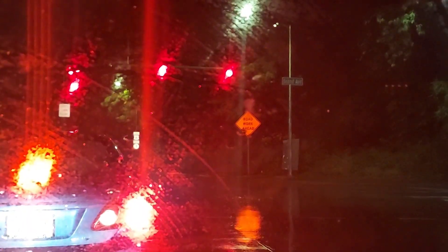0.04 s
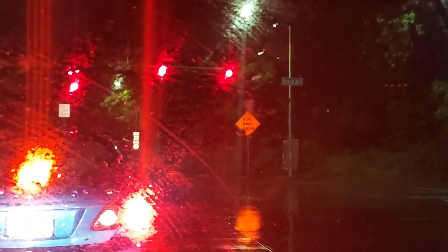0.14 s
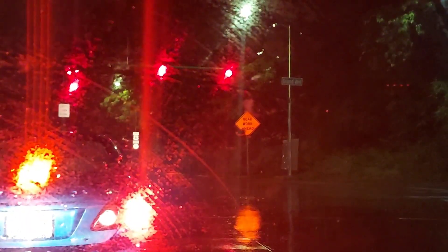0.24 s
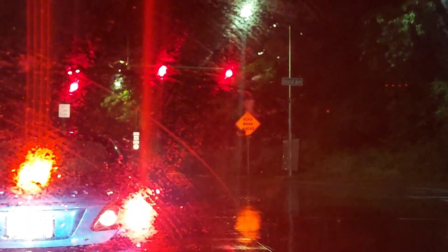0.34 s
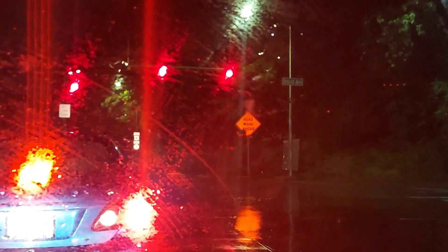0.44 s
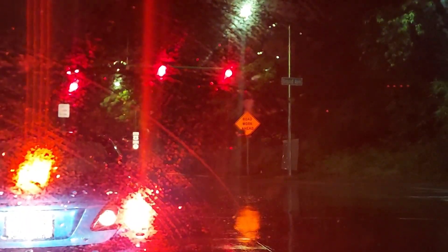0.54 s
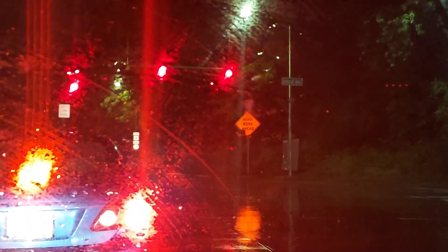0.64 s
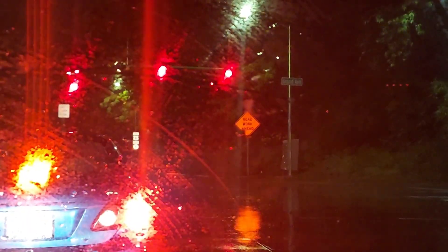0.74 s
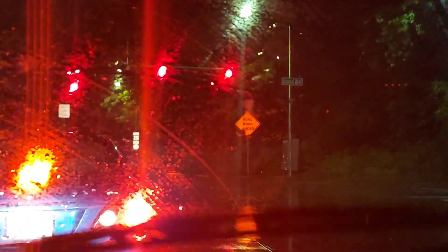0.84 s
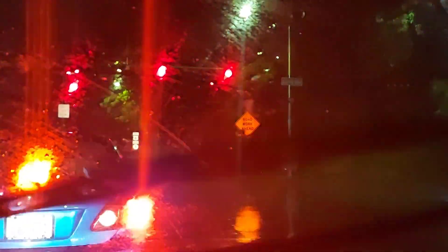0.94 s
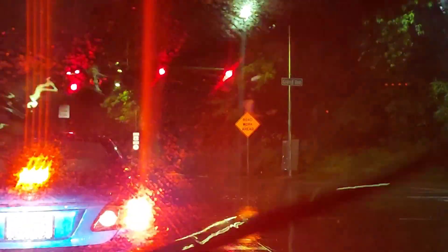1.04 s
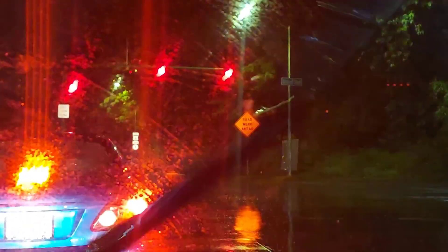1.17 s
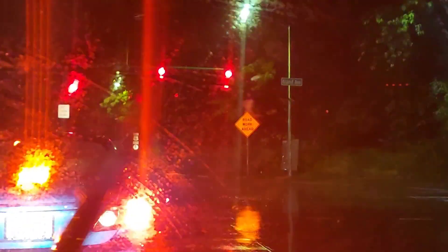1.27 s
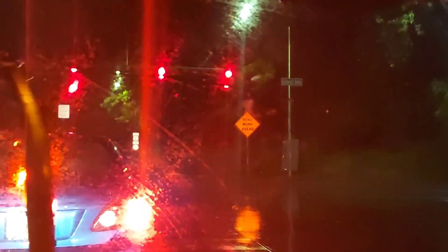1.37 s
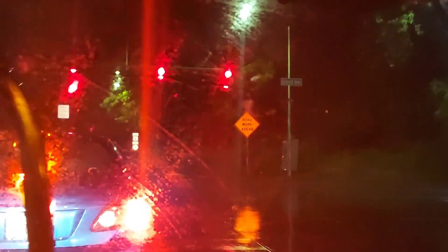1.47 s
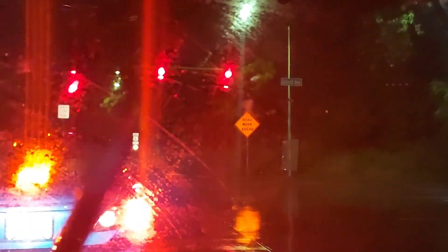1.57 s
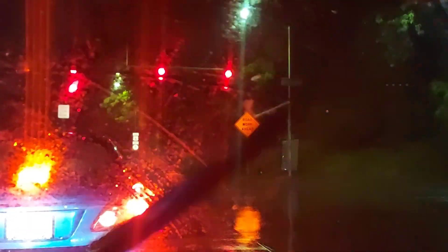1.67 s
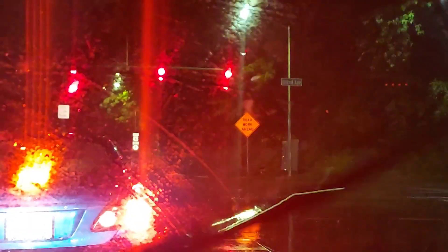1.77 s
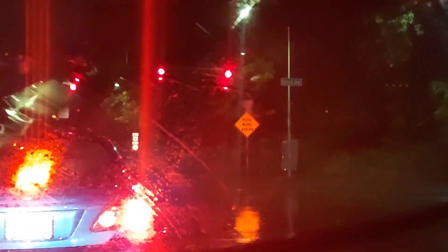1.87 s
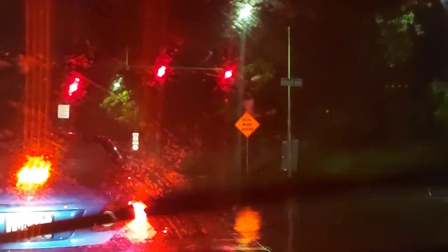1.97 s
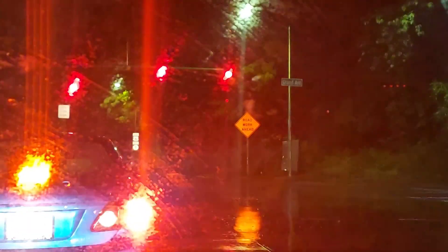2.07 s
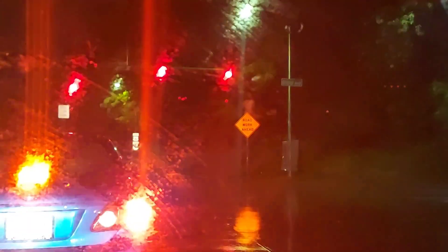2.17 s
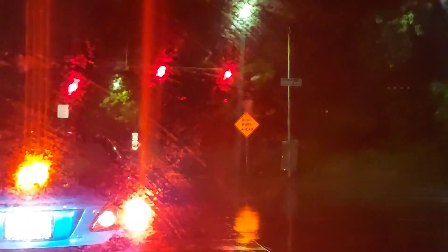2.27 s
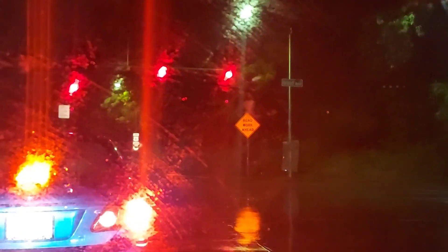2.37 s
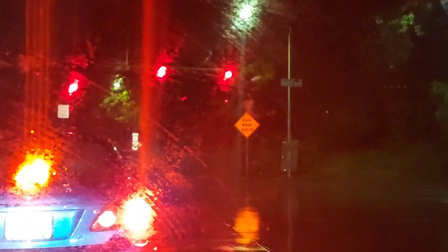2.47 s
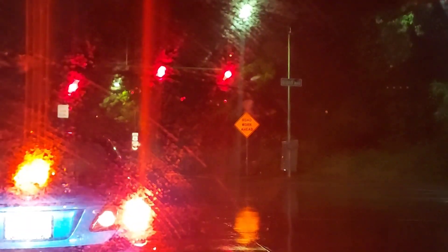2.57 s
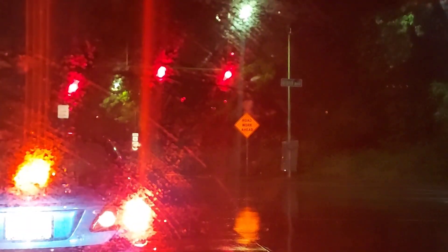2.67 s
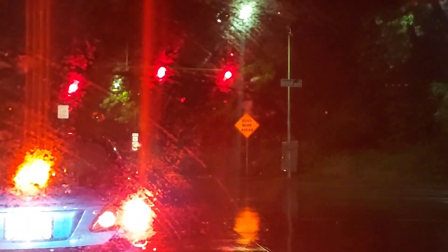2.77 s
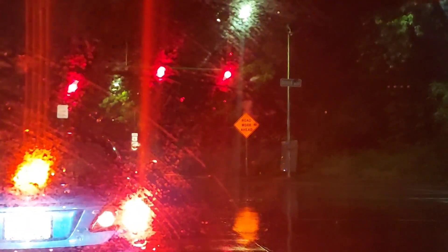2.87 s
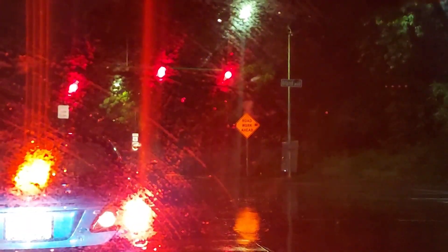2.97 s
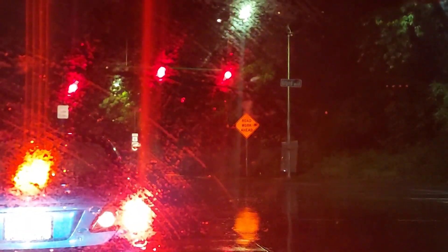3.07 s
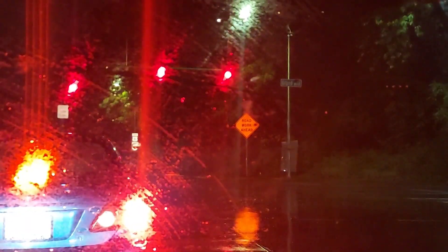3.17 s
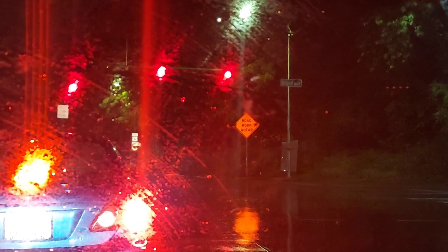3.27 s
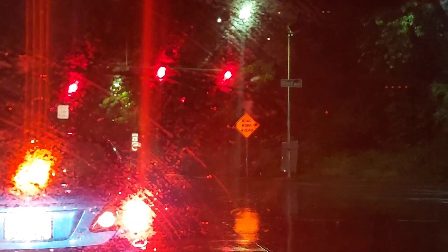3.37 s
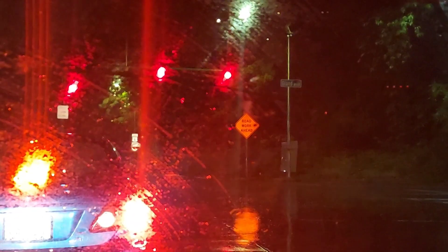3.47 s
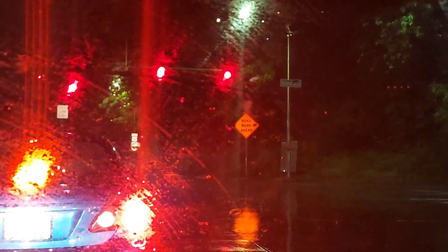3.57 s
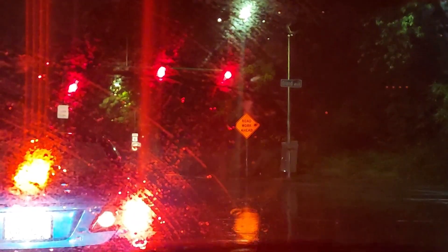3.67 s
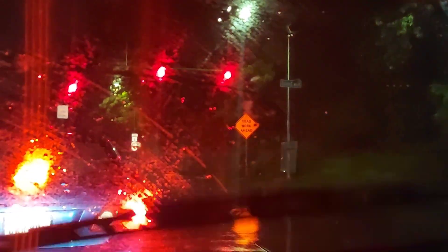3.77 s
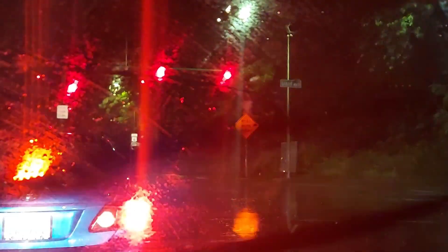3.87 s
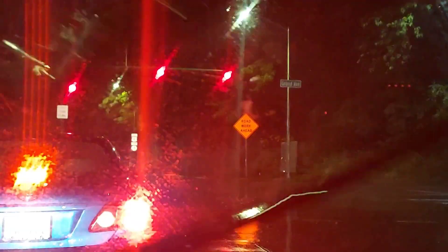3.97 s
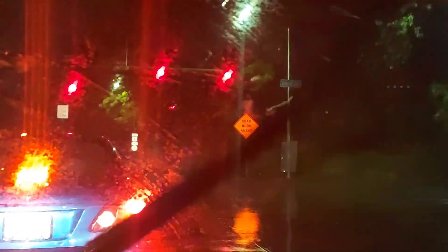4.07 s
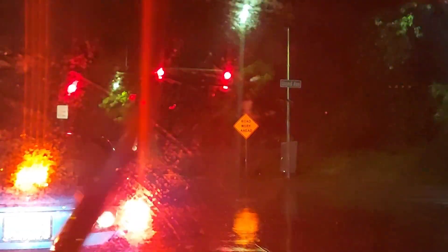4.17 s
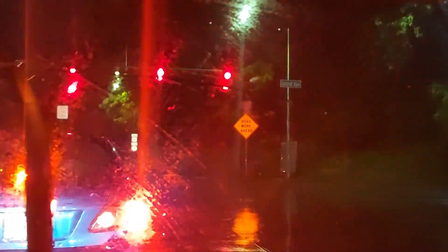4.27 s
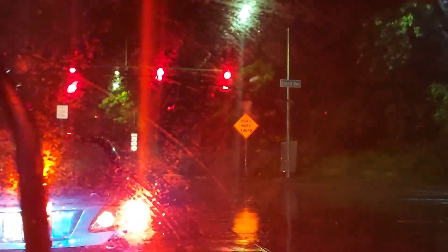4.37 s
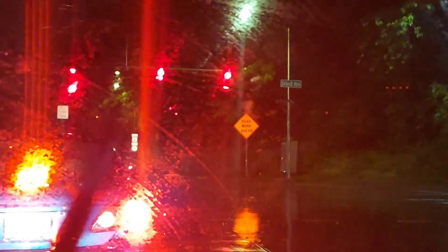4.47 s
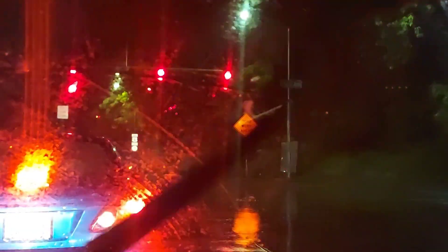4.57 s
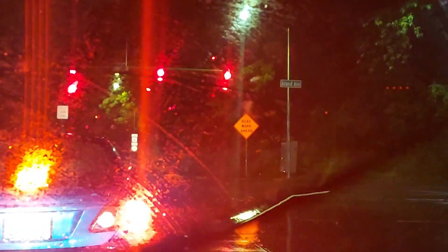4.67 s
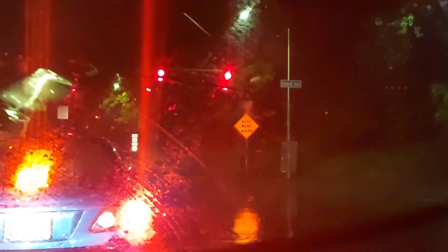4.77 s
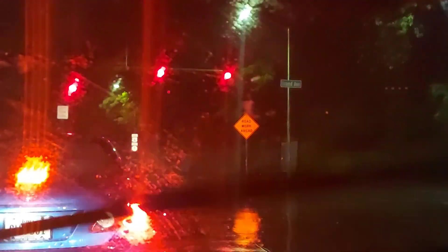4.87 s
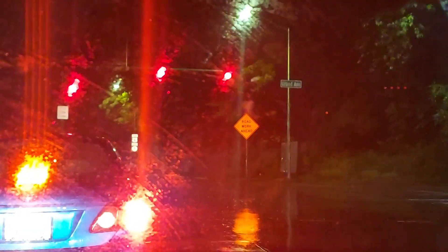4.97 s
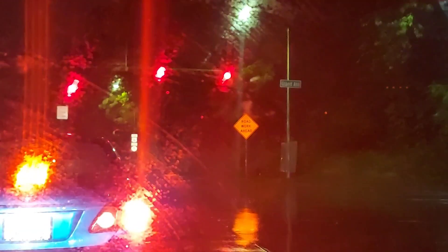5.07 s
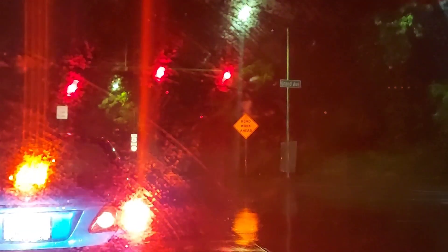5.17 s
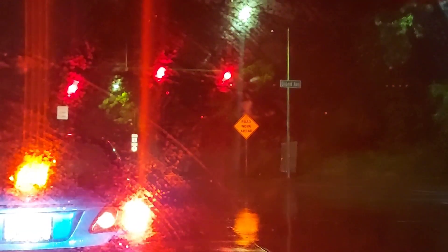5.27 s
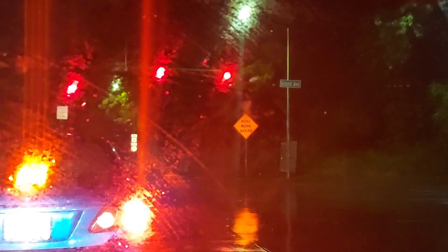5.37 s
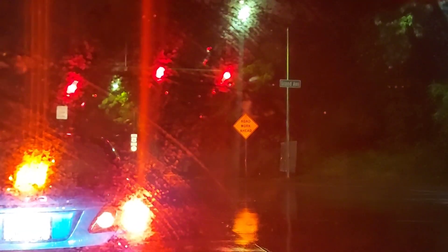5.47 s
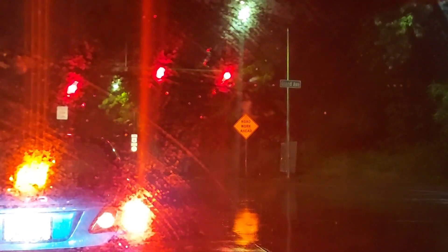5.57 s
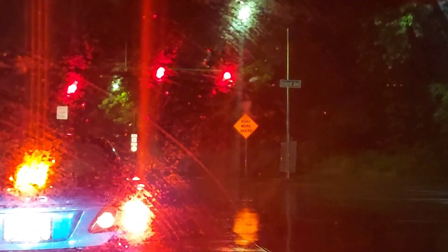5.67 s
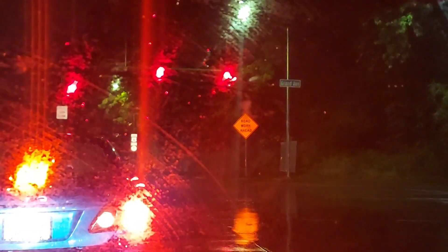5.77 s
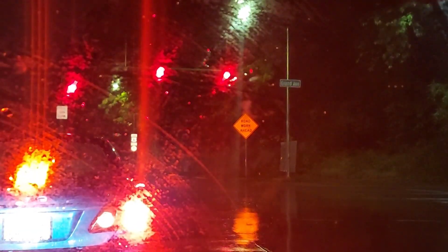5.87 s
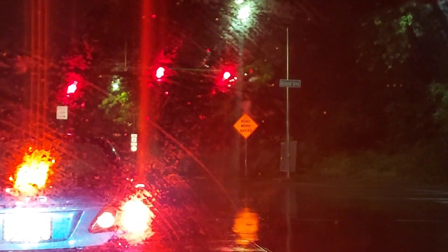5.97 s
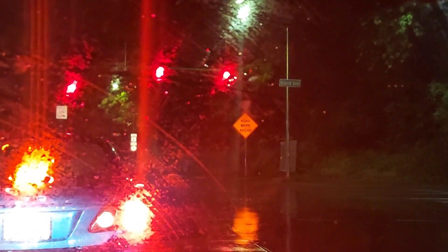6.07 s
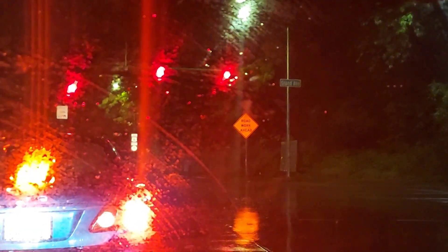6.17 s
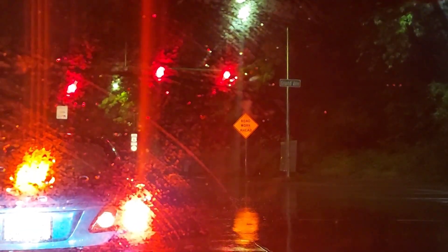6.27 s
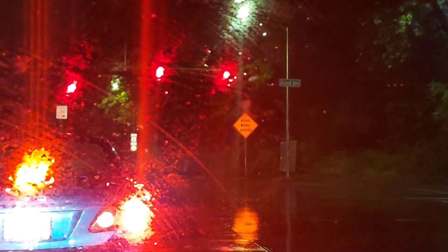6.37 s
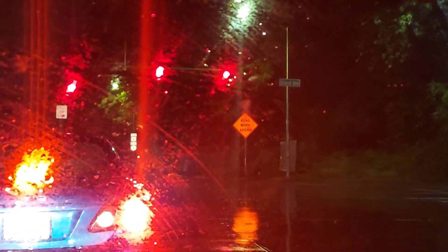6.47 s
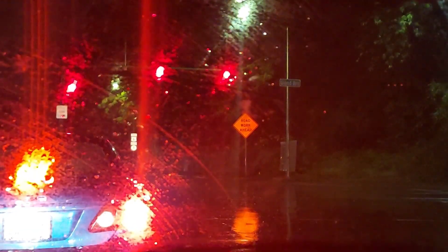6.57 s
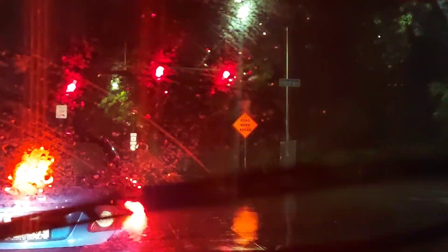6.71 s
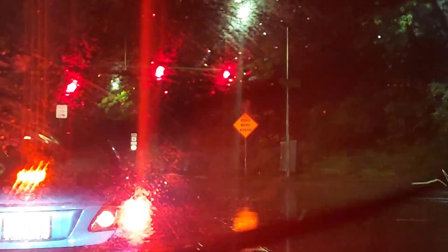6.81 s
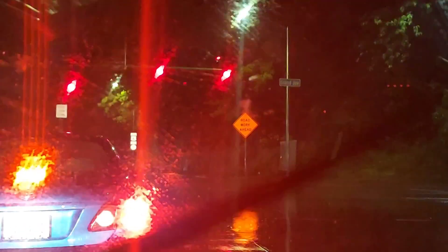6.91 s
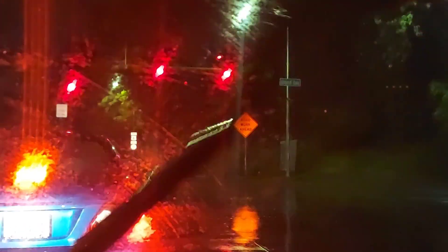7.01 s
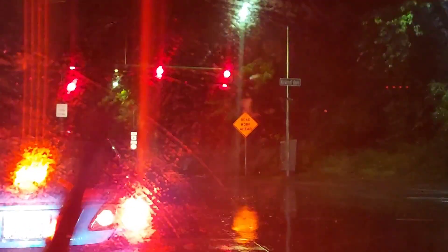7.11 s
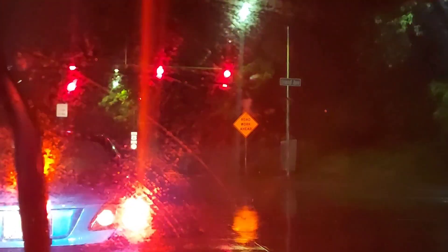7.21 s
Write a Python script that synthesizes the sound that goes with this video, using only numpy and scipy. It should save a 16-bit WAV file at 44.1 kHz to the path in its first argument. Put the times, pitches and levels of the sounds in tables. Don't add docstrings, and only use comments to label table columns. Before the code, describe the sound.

Inside a car idling in light rain at night, wipers sweep every three seconds with paired low thuds over rumble and soft air hiss.

```python
import sys
import numpy as np
from scipy import signal
from scipy.fft import rfft, irfft, next_fast_len
from scipy.io import wavfile
from scipy.ndimage import uniform_filter1d

SR = 44100
rng = np.random.default_rng(int(sys.argv[2]) if len(sys.argv) > 2 else 0)


def nominal_scale(level):
    x = np.asarray(level, float) / 20
    return 10 ** x


def wrap_up_sound(samples):
    columns = np.atleast_2d(samples).T
    tamed = np.clip(columns, -1, 1)
    steps = np.round(tamed * 32767).astype(np.int16)
    wavfile.write(sys.argv[1], SR, steps)


N = 319408

# [t/s of the crest, level/dB]
SET_OFF = [
    (0.8037, 0),
    (3.704, -0.5),
    (6.6025, -1.1),
]
# [t/s of the crest, level/dB]
TURN = [
    (1.5945, 0.1),
    (4.4992, -0.27),
]
# [f/Hz, peak level/dB, delay of swell/s, rise/s, fall/s]
SET_OFF_MODES = [(121.5, -15, -0.0025, 0.011, 0.0061), (125.3, -20, -0.0398, 0.0018, 0.012),
                 (70, -25, -0.0082, 0.011, 0.042), (134.3, -31, -0.044, 0.021, .06),
                 (189.3, -42.5, -0.082, 0.0094, 0.0097), (164.4, -48, -0.023, 0.0084, 0.0085)]
TURN_MODES = [(52.9, -13.5, -0.027, 0.014, 0.029), (113.9, -17.5, -0.027, 0.014, 0.041),
              (110, -19.5, -0.068, 0.0055, 0.0094), (226.3, -31.5, -0.04, 0.0048, 0.0041),
              (220.5, -26, -0.013, 0.0022, 0.0016), (136.7, -28, 0.0021, 0.053, 0.037),
              (198.4, -33, -0.032, 0.035, 0.024), (256.2, -31, -0.029, 0.027, 0.03),
              (108.7, -27, 0.049, 0.0021, 0.016), (505, -48.5, 0.0024, 0.0073, 0.011)]
# [f/Hz, level/dB per Hz]
SCUFF = [
    [(120, -9), (200, -3.5), (275, -15), (736, -22), (1760, -43), (1910, -27), (3000, -51), (3900, -80),
     (6600, -120)],
    [(100, -36), (170, -12), (260, 1.5), (420, -12.5), (491, -14), (853, -21), (997, -39), (1160, -19),
     (1440, -34), (5000, -41.5), (6500, -82), (11000, -120)],
]
# [rms level/dB, delay/s, rise/s, fall/s]
SCUFF_SWELL = [
    (-51, -0.043, 0.0036, 0.045),
    (-44.5, -0.048, 0.0082, 0.015),
]

# [t/s after setting off, level/dB]
UP_DRAG = [(-.115, -58), (-.095, -35), (.06, -34), (.2, -37), (.35, -34.5), (0.436, -35.5), (.45, -53),
           (.62, -39.5), (.74, -35.5)]
# [t/s after the turn, level/dB]
DOWN_DRAG = [(.08, -21.5), (.15, -53), (.27, -46), (.45, -47), (.62, -38.5), (0.746, -41), (.76, -54),
             (.84, -55)]
GRIP_DB = [
    [-1.7, 0.3, -0.4],
    [-2.5, -3.5],
]
BOOM_DB = [-2.5, -1]
BOOM_FADE_DB_PER_S = [-23.5, 1.5]
HUM_DB = [-60, -59.5]
SLACK_HZ = [17.8, 7]
LULL_S = [0.484, 0.784]

# [multiple of the engine cycle, rms level/dB]
ORDERS_DB = [(4, -45.5), (5, -52.5), (6, -78), (8, -59), (9, -71), (10, -51.5), (11, -52), (12, -50.5),
             (14, -73)]

# [t/s, peak level/dB, f/Hz of the ring, t60/s]
KNOCKS = [(0.698, -38, 303, 0.07), (0.75, -36, 240, 0.056), (1.096, -40, 315, 0.052),
          (1.489, -46, 358, 0.051), (2.189, -43, 313, 0.07), (2.211, -36.5, 256, 0.066),
          (2.333, -44, 250, 0.1), (2.899, -36, 258, 0.054), (3.068, -43, 326, 0.07), (3.2, -56, 320, 0.07),
          (3.399, -41, 310, 0.088), (3.649, -25.5, 292, 0.038), (3.681, -25.5, 299, 0.042),
          (5.027, -45, 347, 0.058), (5.118, -40, 241, 0.084), (5.191, -36.5, 357, 0.084),
          (5.599, -41, 258, 0.057), (5.828, -39, 309, 0.085), (6.508, -47, 268, 0.07),
          (6.552, -30, 280, 0.077), (7.197, -44, 304, 0.052)]
# [t/s, peak level/dB, f/Hz of the ring, t60/s]
CLACK = [(.752, -32.5, 434, 0.12), (1.545, -28, 470, 0.081), (1.552, -38, 570, .07),
         (1.555, -42, 850, 0.05), (.47, -45, 400, 0.11), (7.6, -41, 580, .06), (4.462, -34, 422, .12),
         (4.456, -35, 306, 0.1), (6.99, -45, 830, 0.083)]

# [t/s, peak level/dB, f/Hz of the ring, twice the left minus right/dB]
DROPS = [(0.227, -40, 2200, -10), (0.6898, -64, 2200, -2), (0.752, -29, 3400, 7), (1.0954, -38, 1810, -14),
         (1.1313, -47, 1610, 4), (1.1922, -44, 2860, -1), (1.3828, -37, 1940, -1), (1.5933, -34, 1550, -7),
         (1.7045, -38, 2180, 0), (1.8801, -35.5, 3170, 2), (2.044, -38, 3150, 3), (2.0965, -31, 2500, -6),
         (2.3101, -42, 2190, -7), (2.4154, -50, 2660, -6.0), (2.6648, -33.5, 3330, -4),
         (2.8625, -38, 1530, -4.5), (3.1804, -36, 3600, -5.5), (3.6007, -48, 5310, -11),
         (3.896, -34, 2640, -2), (4.0297, -56, 2180, -8), (4.3834, -47, 2190, -10), (4.6788, -47, 3070, 0),
         (4.7027, -34, 2580, -2), (5.2854, -52.5, 2180, 0), (5.3248, -51, 1660, -4.0),
         (6.5231, -36, 3530, -7), (6.7356, -46, 1980, 1), (6.9062, -33, 2190, -3),
         (6.9641, -33.5, 2180, -5.0), (7.012, -40, 3070, -6)]
# [t/s, level/dB]
RAIN = [(0, .4), (1.3, -0.3), (2.4, -1.05), (3.0, 0.5), (3.8, 1.2), (4.7, -0.4), (5.5, -0.7), (6.3, 0.65),
        (6.75, 2), (7.24, 0.2)]
SPLASH_DB = (3.5, 1.8)

# [f/Hz, level/dB per Hz]
RUMBLE = [(19, -40), (33, -2.5), (53, -1), (81, -15.5), (124, -5.5), (207, -16), (271, -15), (366, -16),
          (419, -19), (574, -23.5), (648, -24.5), (720, -26), (1200, -36), (1560, -87), (2640, -120)]
HISS = [(530, -2.5), (900, -7), (1500, -4), (2500, -5), (3300, -3), (3700, -6), (5500, -10), (6600, -8.5),
        (7900, -14.5), (8900, -13.5), (10000, -23), (12000, -11), (14400, -24.5), (16000, -17)]
# [width/Hz, rms level/dB]
TONES_HZ = [161, 179.3, 312, 358.5, 374, 1420, 2187, 3400, 5020, 5311, 5897, 6341, 6462, 6713, 7190, 7826,
            8608, 8797, 8925, 10950, 11736, 12075, 14400]
TONES = [(4.1, -61.5), (7.4, -69.5), (7.7, -60.5), (8.4, -59), (10, -62), (19.8, -76.5), (22.2, -70.5),
         (200, -77), (70, -79), (60, -77.5), (60, -75.5), (50, -85.5), (40, -74.5), (70, -79.5), (90, -87),
         (80, -93), (64, -76.5), (60, -79), (68, -79), (90, -86), (80, -82), (50, -83), (150, -94)]

# [f/Hz, correlation]
SAME = [(40, .98), (130, .92), (290, .82), (640, .58), (1000, .1), (1500, .3), (2300, .1), (3100, -.1),
        (6800, .1), (15000, 0)]
# [f/Hz, level/dB]
LEAN = [(40, -3.5), (65, 1), (110, 4), (200, -4), (380, 2.5), (700, -1.5), (1290, -2), (2380, -3),
        (4400, -5.5), (8120, -12.5), (11000, -3), (15000, -14.5)]
# [f/Hz, level/dB]
PORTS = [(20, -30), (30, -14), (38, 0), (14400, 0), (14800, -9), (16000, -10)]


def evened(x):
    return x / np.sqrt(np.mean(x ** 2) + 1e-20)


def read(points, hz):
    f, value = np.transpose(points)
    return np.interp(np.log(hz + 1), np.log(f + 1), value)


def add(mix, s, sound):
    part = mix[..., round(s * SR):][..., :sound.shape[-1]]
    part += sound[..., :part.shape[-1]]


def swell(t, rise, fall):
    return 2 / (np.exp(np.minimum(-t / rise, 50)) + np.exp(np.minimum(t / fall, 50)))


def bumps(times, wide_s):
    t = np.arange(N) / SR
    return sum(np.exp(-((t - s) / wide_s) ** 2) for s in times)


def drift(hz):
    t = np.arange(0, N + 256, 256) / SR
    rates = np.geomspace(hz / 20, hz, 20)
    slow = sum(np.sin(2 * np.pi * (f * t + rng.random())) / np.sqrt(f) for f in rates)
    return np.interp(np.arange(N) / SR, t, evened(slow))


def resonate(x, hz, width_hz, steady=0):
    turn = np.exp(2j * np.pi * np.cumsum(hz * np.ones(len(x))) / SR)
    r = np.exp(-np.pi * width_hz / SR)
    slow = signal.lfilter([1], np.convolve([1, -r], [1, -r]), x / turn + 1e-18)
    return evened((turn * slow / abs(slow) ** steady).real)


def noise(spectrum, size, patchy_db, flicker_db, length=N):
    frames, hz = 4 * length // size + 5, np.fft.rfftfreq(size, 1 / SR)
    a, b, c, d, patches = rng.standard_normal((frames, len(hz), 5)).T
    patches = evened(uniform_filter1d(uniform_filter1d(patches, 8, 0), 10, 1))
    flicker = evened(uniform_filter1d(rng.standard_normal(frames), 4))
    flicker = flicker / (1 + hz[:, None] / 4200)
    same = np.clip(read(SAME, hz), -1, 1)[:, None]
    left = a + 1j * b
    right = same * left + np.sqrt(1 - same ** 2) * (c + 1j * d)
    level_db = read(spectrum, hz)[:, None] + patchy_db * patches + flicker_db * flicker
    z = np.array([left, right]) * nominal_scale(level_db)
    return evened(signal.istft(z, nperseg=size, noverlap=size * 3 // 4)[1][:, :length])


def flips():
    t, out = np.arange(-.2, .3, 1 / SR), np.zeros((2, N))
    kinds = zip((SET_OFF, TURN), (SET_OFF_MODES, TURN_MODES), SCUFF, SCUFF_SWELL)
    for rows, modes, colour, (db, late, rise, fall) in kinds:
        thud = sum(nominal_scale(peak_db) * swell(t - delay, grow, die) * np.cos(2 * np.pi * hz * t)
                   for hz, peak_db, delay, grow, die in modes)
        rubber = noise(colour, size=1024, patchy_db=1.5, flicker_db=3, length=len(t) * len(rows))
        for (s, strength_db), scuff in zip(rows, np.split(rubber, len(rows), axis=1)):
            scuff = nominal_scale(db) * evened(swell(t - late, rise, fall) * scuff)
            add(out, s + t[0], nominal_scale(strength_db) * (thud + scuff))
    return out


def strokes():
    arm_hz, throb_hz, throb_s, throb_db = 51.96, 11.19, .07, 3
    tighten_s = .06
    lift_s, lift_wide_s = -.015, .04
    out = np.zeros(N)
    shake = rng.standard_normal((3, N))
    ways = zip((SET_OFF, TURN), (UP_DRAG, DOWN_DRAG), GRIP_DB, BOOM_DB, BOOM_FADE_DB_PER_S, HUM_DB, SLACK_HZ)
    for rows, drag, grips, boom_db, fade_db, hum_db, slack_hz in ways:
        s, db = np.transpose(drag)
        for (flip_s, _), grip_db in zip(rows, grips):
            t = np.arange(s[0], min(s[-1], N / SR - flip_s), 1 / SR)
            for_arm, for_glass, for_motor = shake[:, round((flip_s + t[0]) * SR):][:, :len(t)]
            t = t[:len(for_arm)]
            drag_db = np.interp(t, s, db) + grip_db
            slips_db = throb_db * np.cos(2 * np.pi * throb_hz * (t - throb_s))
            judder_hz = arm_hz + slack_hz * swell(t - .08, .05, tighten_s)
            arm = nominal_scale(drag_db + slips_db) * resonate(for_arm, judder_hz, 20, steady=0.77)
            glass_db = drag_db + boom_db + fade_db * t + 0.5 * slips_db
            glass = nominal_scale(glass_db) * resonate(for_glass, 124.2, 41, steady=0.39)
            contact = 1 - np.exp(-((t - lift_s) / lift_wide_s) ** 2)
            motor = nominal_scale(hum_db) * resonate(for_motor, 369.8, 22.5)
            fade = signal.windows.tukey(len(t), .06 * SR / len(t))
            add(out, flip_s + t[0], ((arm + glass) * contact + motor) * fade)
    return out


def lull():
    times = [s + late for rows, late in zip((SET_OFF, TURN), LULL_S) for s, _ in rows]
    return nominal_scale(-5 * bumps(times, wide_s=0.023))


def engine():
    idle_hz = 10.42
    turns = np.cumsum(idle_hz * (1 + 0.0047 * drift(1.5))) / SR
    return sum(nominal_scale(db + 2.5 + 2 * drift(5)) * np.cos(2 * np.pi * (k * turns + rng.random()))
               for k, db in ORDERS_DB)


def knocks():
    out, t = np.zeros(N), np.arange(5000) / SR
    rows = KNOCKS + CLACK
    dull = signal.butter(2, [170, 700], "band", fs=SR)
    puffs = signal.lfilter(*dull, rng.standard_normal((len(rows), len(t))))
    for (s, db, hz, t60), puff in zip(rows, puffs):
        ring = 1.8 * np.sin(2 * np.pi * hz * t) + 0.6 * evened(puff)
        add(out, s, nominal_scale(db - 5 - 60 * t / max(t60, .02)) * ring * (1 - np.exp(-t / 0.0032)))
    return out


def large_drops():
    out, t = np.zeros((2, N)), np.arange(2000) / SR
    envelope = nominal_scale(-60 * t / 0.092) * (1 - np.exp(-t / 0.0025))
    puffs = rng.standard_normal((len(DROPS), 2, len(t)))
    for (s, db, hz, pan_db), puff in zip(DROPS, puffs):
        band = signal.butter(2, [hz / 2, hz * 1.53], "band", fs=SR)
        tick = 0.4 * evened(signal.lfilter(*band, puff)) * envelope
        add(out, s, nominal_scale(db - 7.5) * tick * nominal_scale([[pan_db / 4], [-pan_db / 4]]))
    return out


def drizzle():
    out, t = np.zeros((2, N)), np.arange(2000) / SR
    envelope = nominal_scale(-60 * t / 0.11) * (1 - np.exp(-t / 0.0022))
    size = nominal_scale(5.8 * np.minimum(rng.exponential(1, N), 2)) * (rng.random(N) < 160 / SR)
    patch = rng.integers(0, 12, N)
    for k, hz in enumerate(np.geomspace(400, 4500, 12)):
        band = signal.butter(1, [hz / 2, hz * 1.66], "band", fs=SR)
        tap = signal.lfilter(*band, rng.standard_normal((2, len(t))) * envelope)
        hits = (size * (patch == k))[None]
        out += nominal_scale(-55.5) * signal.oaconvolve(hits, tap / np.sqrt(hz / 1000), axes=1)[:, :N]
    return out


def rain():
    return signal.lfilter(*signal.butter(4, 7000, fs=SR), large_drops() + drizzle())


def tones():
    size = next_fast_len(N)
    hz = np.fft.rfftfreq(size, 1 / SR)
    left, other = rfft(rng.standard_normal((2, size)))
    same = np.clip(read(SAME, hz), 0, 1)
    power = sum(nominal_scale(2 * db) / width / (1 + (2 * (hz - f) / width) ** 2) ** 2
                for f, (width, db) in zip(TONES_HZ, TONES))
    air = np.array([left, same * left + np.sqrt(1 - same ** 2) * other])
    return irfft(air * np.sqrt(power * 2 * SR / np.pi), size)[:, :N]


def blower():
    rain_db = np.interp(np.arange(N) / SR, *np.transpose(RAIN))
    splash = bumps([s - .02 for s, _ in TURN], wide_s=0.15)
    rumble_lift_db, hiss_lift_db = SPLASH_DB
    hiss = nominal_scale(-55.5) * noise(HISS, size=512, patchy_db=0.9, flicker_db=1.77)
    rumble = nominal_scale(-44) * noise(RUMBLE, size=2048, patchy_db=1.42, flicker_db=1.5)
    high = (tones() + hiss) * nominal_scale(rain_db + hiss_lift_db * splash)
    low = rumble * nominal_scale(0.82 * rain_db + rumble_lift_db * splash) * lull()
    return high + low


def scene():
    return flips() + strokes() + engine() * lull() + knocks() + rain() + blower()


def roll_off(x):
    return signal.sosfilt(signal.butter(12, 15700, fs=SR, output="sos"), x)


def record(dry):
    lag_s = .00017
    size = next_fast_len(N)
    hz = np.fft.rfftfreq(size, 1 / SR)
    ports = nominal_scale(np.outer([.5, -.5], read(LEAN, hz)))
    ports = ports / ports.mean(0) * nominal_scale(read(PORTS, hz))
    ports = ports * np.exp(-2j * np.pi * np.outer([lag_s, 0], hz))
    mix = irfft(rfft(dry, size) * ports, size)[:, :N]
    return roll_off(mix)


dry = scene()
out = record(dry)
wrap_up_sound(out)
```